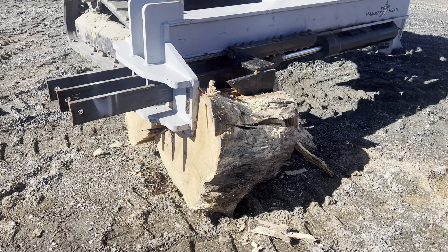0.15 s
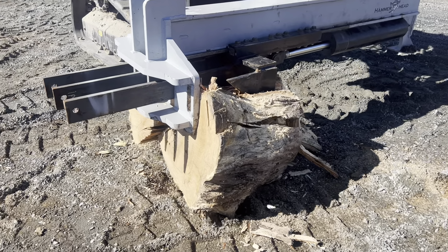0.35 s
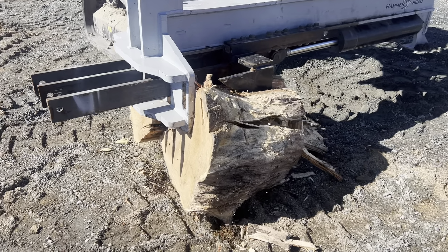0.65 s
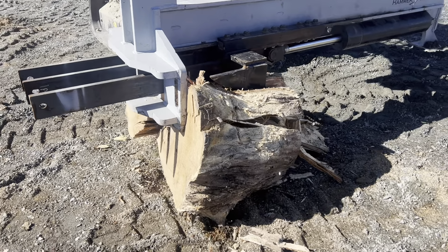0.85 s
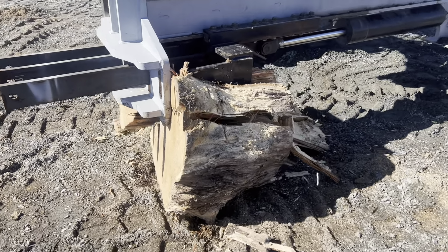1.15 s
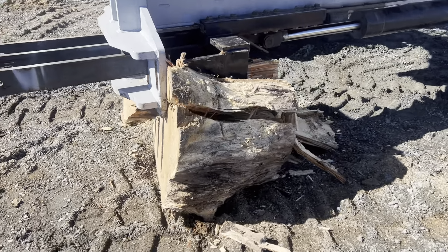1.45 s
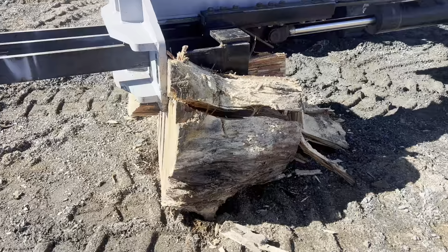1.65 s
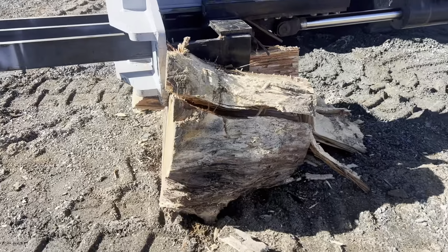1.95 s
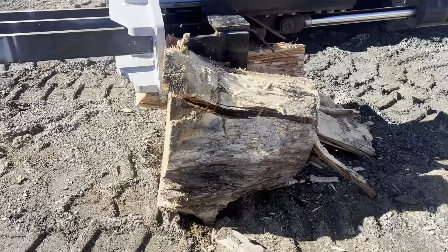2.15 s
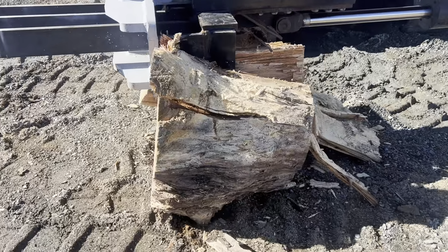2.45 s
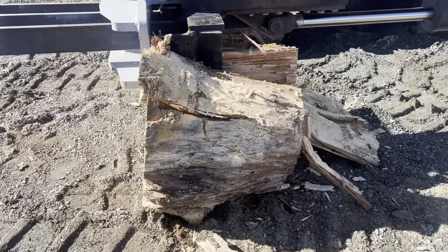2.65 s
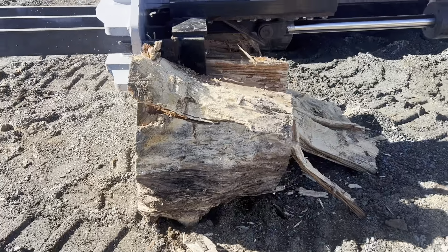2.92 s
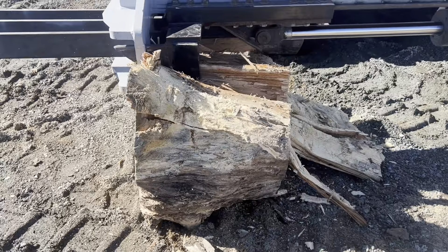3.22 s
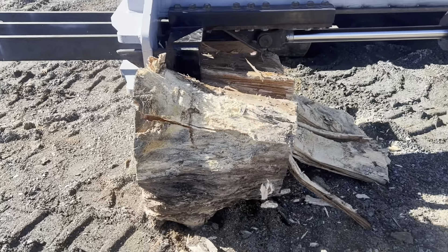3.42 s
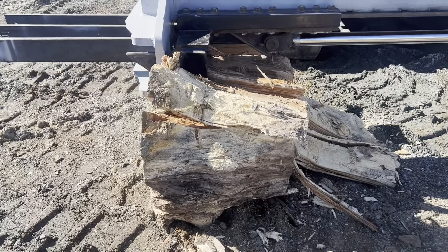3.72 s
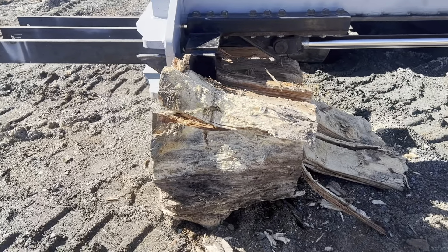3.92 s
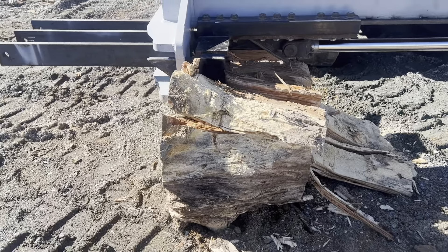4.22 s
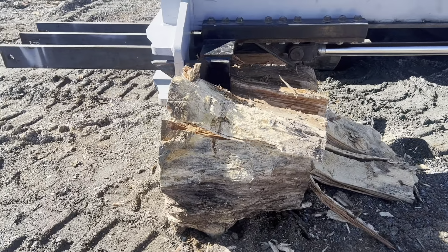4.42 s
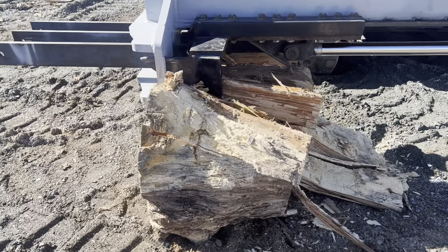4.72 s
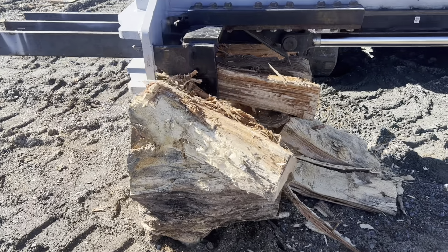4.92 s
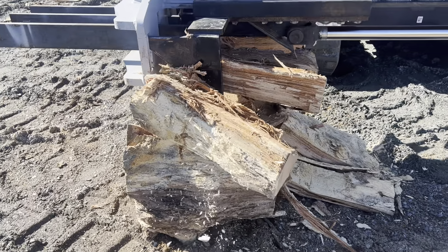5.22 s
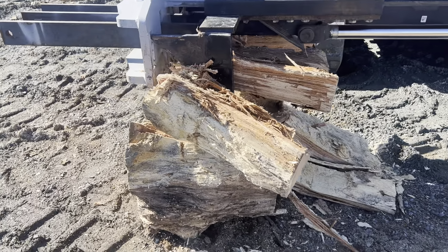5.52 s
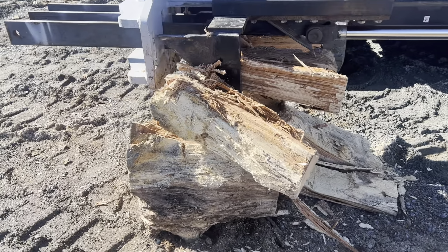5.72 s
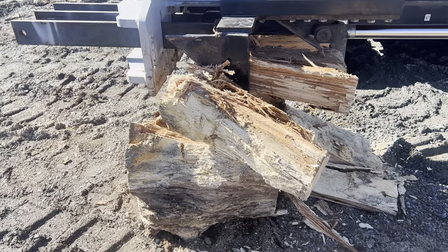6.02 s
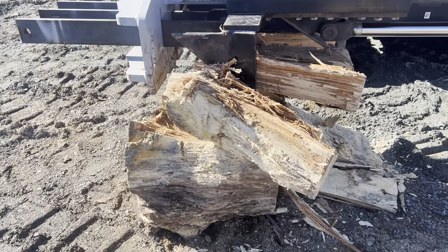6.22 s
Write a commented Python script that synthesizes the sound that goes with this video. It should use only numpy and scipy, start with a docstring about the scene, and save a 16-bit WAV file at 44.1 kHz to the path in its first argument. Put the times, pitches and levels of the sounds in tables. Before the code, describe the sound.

Over a throbbing engine and pump whine, wood fibres crackle, sharp cracks quicken into a tearing split, then rapid juddering knocks and sparse splinters.

```python
"""A hydraulic splitter pushes a big log through its wedge, outdoors on gravel, while engine and pump drone.
From the start fibres crackle and snap in bursts, the log cracks with short pitched rings; then it groans.
A quickening run of cracks with a few wedge squeaks ends as the log tears open.
Last, the log judders along the ringing steel, and a few late cracks and splinters follow.
Random clicks play snapping fibres, resonances give them the sound of wood or steel, and sines hum."""
import sys
import numpy as np
from scipy import signal
from scipy.fft import rfft, irfft, next_fast_len
from scipy.io import wavfile
from scipy.ndimage import uniform_filter1d, map_coordinates

SR = 44100
rng = np.random.default_rng(int(sys.argv[2]) if len(sys.argv) > 2 else 0)


def master(y):
    """Save y as 16-bit WAV."""
    cut = np.clip(np.atleast_2d(y).T, -1, 1)
    pcm = np.round(cut * 32767)  # scale
    wavfile.write(sys.argv[1], SR, pcm.astype(np.int16))


N = 280476
TIME = np.arange(N) / SR

# Engine hum: (multiple of the firing rate, relative level [dB])
ENGINE_ORDERS = [(1, -27.5), (1.5, -48), (2, -38.5), (2.5, -46.5), (4, -48.5), (5, -61), (6, -50.5),
                 (12, -70)]
# Pump whine: (multiple of the pump pitch, relative level [dB])
PUMP_TONES = [(1, -38.5), (2, -53.5)]
# Blade tone of the cooling fan: (multiple of the fan pitch, relative level [dB])
FAN_TONES = [(1, -47.5)]
# Whine an octave above the fan tone: (time [s], level [dB])
FAN_WHINE = [(0, -62), (5.0, -67), (5.4, -55), (6.3, -55)]
# Colour of the engine roar and fan noise: (frequency [Hz], relative level [dB per Hz])
ROAR_COLOUR = [(25, -28), (42, -16), (65, -0.5), (100, -5.5), (160, 0.5), (215, -1), (290, -12),
               (380, -9.5), (500, -13.5), (700, -19), (1100, -25.5), (2000, -33.5), (4500, -41),
               (6500, -44.5), (8700, -41.5), (11500, -88), (15000, -49)]
# The machine as heard from the moving listener: (time [s], roar [dB], pump [dB])
MACHINE_LEVELS = [(0, -25, 6), (.6, -25.5, 2), (1.3, -29, -3), (3.2, -29.5, 1), (4.5, -31, 1),
                  (5, -30, 2.5), (6.3, -27, 5)]
# How alike the roar is on the left and right: (frequency [Hz], likeness [0-1])
SIDE_LIKENESS = [(35, .75), (70, 0.95), (290, 1), (640, 0.81), (1400, 0.79), (3100, 1), (7000, 0.29),
                 (15000, 0.11)]
# Strain on the fibres, which sets how loudly they crackle: (time [s], level [dB])
FIBRE_STRAIN = [(0, -41), (.16, -44.5), (.22, -34.5), (.39, -40.5), (.53, -40.5), (.65, -42.5),
                (1.4, -41.5), (2.3, -42), (2.55, -32), (2.82, -40.5), (3.07, -47), (3.42, -47.5),
                (3.65, -51.5), (4.7, -51.5), (5.2, -58)]
# Colour of the fine crackle: (frequency [Hz], relative level [dB per Hz])
CRACKLE_COLOUR = [(400, -16), (900, 16.5), (1600, 4), (3000, 0), (6000, -2), (8500, -2), (12000, -1),
                  (16000, -3.5)]
# Cracks in the log: (time [s], length [s], relative level [dB], relative low thump level [dB])
CRACKS = [(0.026, 0.002, -29.5, -21.5), (0.0912, 0.0005, -30.5, -24.5), (0.1637, 0.0005, -31, -24),
          (0.185, .001, -33, -25.5), (0.202, 0.0077, -31.5, -30), (0.2376, 0.0052, -31, -31),
          (0.272, 0.013, -29.5, -22), (0.3, 0.0085, -31, -34), (0.3563, 0.0024, -22, -12),
          (0.381, 0.024, -31, -19.5), (0.436, 0.015, -25, -25), (0.486, 0.015, -23, -17),
          (0.772, 0.015, -28, -25.5), (0.832, 0.02, -22.5, -24.5), (0.866, 0.021, -35.5, -32),
          (0.893, 0.013, -28.5, -50), (0.912, 0.0036, -32.5, -41), (0.948, 0.0087, -34.5, -45),
          (1.027, .003, -37, -23), (1.031, 0.011, -26, -23.5), (1.214, 0.013, -31.5, -42),
          (1.535, 0.00092, -34.5, -45), (1.873, .002, -37, -31.5), (2.013, 0.002, -33.5, -26.5),
          (2.057, .003, -57, -15.5), (2.0645, 0.004, -19, -14), (2.13, 0.0027, -37.5, -22),
          (2.189, 0.014, -18.5, -14), (2.326, 0.0031, -19, -13), (2.397, 0.0012, -21.5, -15),
          (2.433, 0.0039, -21.5, -13.5), (2.483, 0.0015, -30, -22), (2.512, 0.0022, -20.5, -15.5),
          (2.555, 0.002, -21.5, -21.5), (2.588, 0.0041, -21.5, -13.5), (2.632, 0.0018, -20.5, -15.5),
          (2.66, 0.0045, -23, -16.5), (2.682, 0.0053, -21, -22), (2.706, 0.0078, -22.5, -32),
          (2.722, 0.0052, -20, -16.5), (2.727, 0.0023, -20.5, -15), (2.74, 0.0048, -24, -29),
          (2.745, 0.0061, -25.5, -44), (2.757, 0.0034, -29, -18), (2.767, 0.0041, -24, -29),
          (2.778, 0.0027, -28.5, -32), (2.788, .002, -33, -27), (2.807, 0.0092, -30, -19.5),
          (2.829, 0.0073, -35, -24), (2.842, 0.016, -31, -26), (2.861, 0.007, -35.5, -37),
          (2.902, .003, -45, -45), (3.554, 0.033, -41, -53), (3.798, 0.021, -44.5, -46),
          (4.254, 0.024, -33.5, -27.5)]
# Edges of a crack's four registers, thump, knock, snap and fizz: frequency [Hz]
CRACK_EDGES = [280, 620, 1800, 5000, 16500]
# Resonances of the log: (frequency [Hz], width [Hz], relative level [dB])
LOG_MODES = [(383, 58, -3.5), (462, 32.3, 4), (492, 30, 2), (635, 138, -6), (848, 87, -10), (963, 28, -2.5),
             (1085, 225, -10), (1474, 31, -6), (2230, 130, -9), (2820, 355, -3), (3430, 650, -8.5),
             (4460, 220, -5.5), (5040, 980, -24), (6530, 330, -7.5)]
# Ringing of the wedge's edge after cracks: (frequency [Hz], relative level [dB], time to fall 60 dB [s])
WEDGE_EDGE_MODES = [(5240, -7, .14), (6600, 8, 0.23)]
# Long ring of the wedge after jerks: (frequency [Hz], relative level [dB], time to fall 60 dB [s])
WEDGE_MODES = [(1346, -7, .3), (1685, -11, .35), (2120, 0, .55), (2165, -8, .4), (2546, -3, .3),
               (2800, -4, .25), (4290, -15, .27), (5850, -15, .24)]
# Thin splinters that snap off without moving the log: (time [s], relative level [dB])
SPLINTERS = [(0.05, -52), (0.071, -44), (0.128, -47), (0.315, -44), (0.328, -44), (0.391, -36),
             (0.412, -32.5), (0.559, -56), (0.626, -37), (0.6615, -48), (0.697, -58), (0.725, -59),
             (0.934, -50), (1.265, -40.5), (1.336, -46), (1.411, -41), (1.476, -41.5), (1.62, -46),
             (1.63, -55), (1.72, -40.5), (1.856, -45.5), (1.942, -43), (2.031, -47), (2.457, -37),
             (3.517, -50), (3.646, -53), (4.574, -60), (4.796, -50), (4.83, -55), (4.875, -55), (4.89, -57),
             (4.988, -48)]
# Short rings of the struck log, after single cracks and the first jerk:
# (time [s], pitch [Hz], level [dB], time to fall 60 dB [s])
STRUCK_RINGS = [(.205, 785, -27, 0.057), (.275, 751, -21.5, 0.056), (.303, 805, -28, 0.072),
                (.305, 575, -34, 0.15), (.36, 527, -21, 0.12), (.359, 3290, -28, 0.037),
                (.44, 576, -30, 0.17), (0.487, 2870, -26.5, 0.031), (0.489, 5050, -27, 0.04),
                (.774, 1185, -23.5, 0.027), (.837, 938, -16, 0.084), (.894, 1380, -27.5, 0.04),
                (.896, 2040, -33, .04), (.914, 930, -29, .05), (1.032, 316, -24.5, 0.071),
                (1.033, 850, -20, 0.033), (1.033, 2795, -31, 0.093), (1.033, 3300, -26.5, 0.06),
                (1.22, 851, -27, 0.11), (1.221, 1384, -34, 0.054), (1.22, 2013, -38, 0.065),
                (2.07, 461, -17, 0.25), (2.067, 867, -23.5, 0.22), (2.067, 736, -24, 0.086),
                (2.067, 3560, -44, 0.04), (2.191, 3300, -22.5, 0.062), (2.198, 388, -13, 0.038),
                (2.198, 696, -23, 0.1), (2.198, 854, -23, 0.12), (2.328, 660, -21, 0.08),
                (2.333, 850, -21, 0.2), (2.591, 1020, -25, 0.043), (2.722, 396, -22, .07),
                (2.724, 920, -26, 0.055), (2.767, 1190, -24.5, 0.042), (2.807, 839, -28.5, .35),
                (2.963, 480.3, -22.5, 0.4), (4.256, 2100, -40, 0.072), (4.255, 4180, -42, 0.08)]
# Groans of the squeezed log: (time of the peak [s], level [dB], fading [dB per s],
# slip rate at the peak [per s], pitch ratio, overtone before the pitch ratio [Hz])
GROANS = [(0.502, -22.5, 333, 110, 1.02, 1480), (1.445, -28, 172, 154, 1.01, 1700),
          (1.466, -35.5, 147, 121, 1.04, 1220), (1.513, -48, 200, 120, 1.0, 1680),
          (1.588, -25.5, 113, 122, 0.99, 1540), (1.738, -39, 172, 104, 1.02, 1480),
          (2.025, -36, 298, 137, 1.04, 1500)]
# Resonances heard in every groan: (frequency [Hz], width [Hz], relative level [dB])
GROAN_MODES = [(849, 21, 16), (935, 39, -2), (2250, 130, -10.5), (2560, 180, -15)]
# Tones from steady rubbing: (time of the middle [s], length [s], level [dB])
MOANS = [(1.23, .15, -46), (1.83, 0.15, -36)]
# Ring of the two halves while the split gapes, started by each thump:
# (frequency [Hz], relative level [dB], time to fall 60 dB [s])
HALVES_MODES = [(410, 3.5, .11), (444, -2, .32), (503, -6.5, .45), (850, -13, .3)]
# Squeaks of wood on the wedge: (time [s], peak level [dB])
SQUEAKS = [(2.438, -15), (2.517, -8.5), (2.559, -7)]
# Two runs of jerks along the steel: (time [s], relative blow level [dB], relative rattle level [dB])
JERKS = [(2.962, -20.5, -20), (2.98, -26, -28), (3.002, -23.5, -21), (3.021, -29, -25), (3.04, -27, -24),
         (3.058, -50, -51), (3.08, -42, -33), (3.108, -55, -35.5), (3.259, -19, -21), (3.2745, -21, -23.5),
         (3.2852, -19, -22), (3.2985, -22, -24.5), (3.3135, -22, -23.5), (3.336, -21.5, -21.5),
         (3.3597, -22.5, -20.5), (3.3828, -23, -22.5)]
# Where wood meets steel, as a jerk strikes it: (frequency [Hz], width [Hz], relative level [dB])
CONTACT_MODES = [(1210, 200, -2.5), (2330, 360, 0.5), (3360, 290, -9), (4270, 130, 4.5)]
# Resonances of the splitter frame: (frequency [Hz], width [Hz], relative level [dB])
FRAME_MODES = [(336, 38, 5.5), (498, 69, 9.5), (680, 51, 6), (803, 34, 7), (970, 41, 2), (1205, 40, 5.5),
               (1404, 36, -1), (1540, 24, 1), (1610, 30, 6), (1910, 110, -0.5), (2250, 43, -2.5),
               (2400, 71, -3), (3260, 190, -8.5), (3550, 100, -6.5), (4130, 130, -27), (5730, 510, -35)]
# The log bouncing back against the steel: (frequency [Hz], width [Hz], relative level [dB])
REBOUND_MODES = [(1180, 180, -3.5), (1630, 140, -6), (2520, 130, -13)]
# How the wood leans to one side: (frequency [Hz], left minus right [dB])
WOOD_BALANCE = [(400, -2.5), (700, 0), (1300, 3.5), (2500, 1), (4400, 3), (8100, 1.5), (15000, -1.5)]
# Treble of the microphone: (frequency [Hz], level [dB])
MIC_TREBLE = [(3000, 0), (5500, -1), (8500, -2), (11500, -3.5), (14000, -6.5), (16000, -5)]
# The two microphone ports hear out of step: (frequency [Hz], lead of the left [radians])
PORT_PHASE = [(0, 0.044), (1200, 0.44), (1700, 0.71), (3100, 1), (4500, 1), (7500, 0.68)]
# In the top octave the right port leads by a plain delay: (frequency [Hz], lead of the left [radians])
PORT_DELAY = [(8400, 0), (17000, -14.7)]

FIRING_HZ, PUMP_HZ, FAN_HZ = 82.75, 261.0, 499
# The split gapes between these times and takes GAPE_S to change.
OPENS_S, PARTS_S, GAPE_S = 1.74, 2.725, 0.067
# Knock, snap and fizz relative to a crack's level: closed wood muffles the cracks inside it.
MUFFLED_DB, GAPING_DB = (3.5, -0.5, -2), (-1, 0.5, -0.5)


def from_db(db):
    """Turn decibels into a gain."""
    return 10 ** (np.asarray(db) / 20)


def rms_one(x):
    """Scale a sound to an average strength (rms) of 1."""
    return x / np.sqrt(np.mean(x ** 2) + 1e-20)


def unit_burst(x):
    """Scale a short sound to the energy of 20 ms at rms 1."""
    return rms_one(x) * np.sqrt(.02 * SR / len(x))


def in_time(rows):
    """Read each column of a time curve at every sample."""
    s, *columns = np.transpose(rows)
    return [np.interp(TIME, s, column) for column in columns]


def at_hz(points, hz):
    """Read a spectrum between its points on a log-frequency axis."""
    point_hz, values = np.transpose(points)
    return np.interp(np.log(np.maximum(hz, 1)), np.log(point_hz), values)


def drift(rate):
    """Wander at random around zero with rms 1; a higher rate wanders faster."""
    knots = rng.standard_normal(4096)
    # one value serves 32 samples
    curve = map_coordinates(knots, [TIME[::32] * rate * 2], order=2, mode="wrap")
    return rms_one(curve).repeat(32)[:N]


def band(x, low_hz, high_hz, order=2):
    """Keep the sound between two frequencies."""
    edges = [low_hz, min(high_hz, .45 * SR)]
    return signal.sosfilt(signal.butter(order, edges, "band", fs=SR, output="sos"), x + 1e-18)


def resonate(x, modes):
    """Excite side-by-side resonances of alternating sign; a narrow one rings longer."""
    out = 0
    for k, (hz, width, db) in enumerate(modes):
        r = np.exp(-np.pi * width / SR)
        top = (-1) ** k * from_db(db) * (1 - r * r) / 2
        feedback = [1, -2 * r * np.cos(2 * np.pi * hz / SR), r * r]
        out = out + signal.lfilter([top, 0, -top], feedback, x + 1e-18)
    return out


def add(track, s, sound):
    """Mix a sound into a track at time s."""
    i = max(round(s * SR), 0)
    track[..., i:i + sound.shape[-1]] += sound[..., :N - i]


def grains(size, per_s, spread_db):
    """Make random clicks of uneven size and sign."""
    sizes = from_db(spread_db * np.minimum(rng.exponential(1, size), 4))
    signs = rng.choice([-1, 1], size)
    return sizes * signs * (rng.random(size) < per_s / SR)


def colour(x, spectrum):
    """Filter a sound with a spectrum in dB."""
    size = next_fast_len(N + SR // 10)
    gain = from_db(at_hz(spectrum, np.fft.rfftfreq(size, 1 / SR)))
    return irfft(rfft(x, size) * gain, size)[..., :N]


def gape(s):
    """Tell how far the split stands open at time s, 0-1."""
    return np.clip(min(s - OPENS_S, PARTS_S - s) / GAPE_S + .5, 0, 1)


def tones(hz, partials, wander, flutter_db):
    """Sum multiples of one pitch that wanders a little, each fluttering in level."""
    turns = np.cumsum(hz * (1 + wander * drift(5.2))) / SR
    out = 0
    for k, db in partials:
        strength = np.sqrt(2) * from_db(db + flutter_db * min(k, 2) * np.tanh(drift(7.6)))
        out = out + strength * np.sin(2 * np.pi * (k * turns + rng.random()))
    return out


def machine(throb=0.13, hiss_db=-26.0, hiss_follows=0.25, split_hz=600):
    """Firing hum, pump whine, fan tone, and a roar that throbs with the firings."""
    low_db, pump_db = in_time(MACHINE_LEVELS)
    hum = tones(FIRING_HZ, ENGINE_ORDERS, wander=0.0017, flutter_db=1.5)
    pump = from_db(pump_db) * tones(PUMP_HZ, PUMP_TONES, wander=0.0023, flutter_db=1.0)
    # mix a shared noise with an opposite-sided one to set how alike the sides are
    alike = np.clip(at_hz(SIDE_LIKENESS, np.fft.rfftfreq(N, 1 / SR)), 0, 1)
    throbbing = 1 + throb * np.sin(2 * np.pi * FIRING_HZ * TIME)
    mid, side = rfft(rng.standard_normal((2, N)) * throbbing)
    noise = irfft(np.sqrt(1 + alike) * mid + np.sqrt(1 - alike) * side * [[1], [-1]], N)
    roar = rms_one(colour(noise, ROAR_COLOUR))
    low = signal.sosfiltfilt(signal.butter(2, split_hz, fs=SR, output="sos"), roar)
    low = low * from_db(1.2 * drift(5))   # the roar swells and sinks a little
    hiss = from_db(hiss_follows * low_db + hiss_db) * (roar - low)
    fan = tones(FAN_HZ, FAN_TONES, wander=0.0028, flutter_db=3.0)
    whine = from_db(in_time(FAN_WHINE)[0]) * tones(FAN_HZ, [(2, 0)], wander=0.002, flutter_db=1)
    return hum + pump + fan + whine + from_db(low_db) * low + hiss


def fibres(crackle_db=-0.6, murmur_db=4, clump_db=2.5, tick_db=-10, ticks_per_s=60):
    """Under strain fine fibres snap in clumps, thicker ones tick singly, and the log's low modes murmur."""
    snaps = grains(N, 2200, spread_db=0.0) * from_db(clump_db * drift(35))
    crackle = from_db(crackle_db) * rms_one(colour(snaps, CRACKLE_COLOUR))
    knocks = resonate(grains(N, ticks_per_s, spread_db=5.5), LOG_MODES)
    ticks = from_db(tick_db) * rms_one(band(knocks, 820, 5700))
    low_wood = resonate(grains(N, 500, spread_db=0.0), LOG_MODES[:4])
    murmur = from_db(murmur_db) * rms_one(low_wood)
    strain = from_db(in_time(FIBRE_STRAIN)[0])
    return strain * (crackle + murmur + ticks * (TIME < PARTS_S))


def vary_log(detune=0.028, vary_db=3):
    """Each crack opens at another place, so the log's modes shift in pitch and strength."""
    modes = []
    for hz, width, db in LOG_MODES:
        a, b = rng.standard_normal(2)
        modes.append((hz * np.exp(detune * a), width, db + vary_db * np.tanh(b)))
    return modes


def register_levels(s, level_db, thump_db, thump_trim_db=-1, ring_takes_db=4.5, small_db=-34, brightens=0.68):
    """Set thump, knock, snap and fizz: an open split is brighter, and so is a small crack of thin fibres."""
    tilt_db = brightens * max(small_db - level_db, 0) * np.array([-1, 0, 1])
    wood_db = gape(s) * np.array(GAPING_DB) + (1 - gape(s)) * np.array(MUFFLED_DB)
    # the ringing halves take some of the dry thump
    dry_thump_db = thump_db + thump_trim_db - gape(s) * ring_takes_db
    return [dry_thump_db, *(level_db + tilt_db + wood_db)]


def cracks(snaps_per_s=6500, rise=0.00025, fade=0.0044, after_db=-20, after_fade=0.092, direct_db=-16,
           first_db=2, break_db=12, break_lag=0.00092, band_fade=(.5, .15, .08, .035)):
    """Each crack is an avalanche of snapping fibres, strongest at first, that sets the log ringing."""
    out, t = np.zeros(N), TIME[:SR // 4]
    filters = [signal.butter(3, edges, "band", fs=SR, output="sos")
               for edges in zip(CRACK_EDGES, CRACK_EDGES[1:])]
    for s, length, level_db, thump_db in CRACKS:
        past = np.maximum(t - length, 0)
        avalanche = np.exp(-past / fade) + from_db(first_db) * np.exp(-t / fade)
        avalanche = avalanche + from_db(after_db) * np.exp(-past / after_fade)
        snaps = np.minimum(t / rise, 1) * avalanche * grains(len(t), snaps_per_s, spread_db=1.0)
        # fibres give way in bundles, and the first bundle breaks at once
        snaps = snaps * from_db(3 * np.minimum(t / .005, 1) * drift(300)[:len(t)])
        snaps[int(break_lag * SR)] += from_db(break_db)
        wood = resonate(snaps, vary_log()) + from_db(direct_db) * snaps
        levels = register_levels(s, level_db, thump_db)
        for sos, db, dies in zip(filters, levels, band_fade):
            # late snaps are duller: the treble dies first
            register = signal.sosfilt(sos, wood) * np.exp(-past / dies)
            add(out, s, from_db(db) * unit_burst(register))
    return out


def ring_on(blows, modes, level_db, waver_hz):
    """Lightly damped modes gather energy from every blow (time [s], level [dB]) and ring on afterwards."""
    fed, out = np.zeros(N), 0
    for s, db in blows:
        add(fed, s, from_db([db + level_db]) ** 2)
    fed = signal.lfilter(np.full(128, 1 / 128), [1], fed)   # soften each start over 128 samples
    for hz, db, t60 in modes:
        keeps = from_db(-60 / (t60 * SR)) ** 2
        energy = signal.lfilter([1], [1, -keeps], fed + 1e-18)
        turns = np.cumsum(hz + waver_hz * drift(6.2)) / SR   # the shifting load bends the pitch
        out = out + from_db(db) * np.sqrt(energy) * np.sin(2 * np.pi * turns)
    return out


def wedge(edge_db=-25):
    """The wedge's edge rings thinly with every crack, and the steel sings on after the jerks."""
    crack_blows = [(s, db) for s, _, db, _ in CRACKS]
    jerk_blows = [(s, db) for s, _, db in JERKS]
    edge = ring_on(crack_blows, WEDGE_EDGE_MODES, level_db=edge_db, waver_hz=12.3)
    return edge + ring_on(jerk_blows, WEDGE_MODES, level_db=-15.5, waver_hz=3)


def splinters(level_db=1, snaps_per_s=6500, fade=0.0017, low_hz=1700, high_hz=10000):
    """A splinter gives one short, bright spray of snaps."""
    out, t = np.zeros(N), TIME[:SR // 20]
    for s, db in SPLINTERS:
        snaps = grains(len(t), snaps_per_s, spread_db=3) * np.exp(-t / fade)
        spray = band(snaps, low_hz, high_hz, order=1)
        add(out, s, from_db(db + level_db) * unit_burst(spray))
    return out


def struck(hz, t60, waver=0.0065, rise=0.0007):
    """One mode of wood dies away while the shifting load bends its pitch."""
    t = TIME[:SR // 3]
    turns = np.cumsum(hz * (1 + waver * drift(40)[:len(t)])) / SR
    shape = (1 - np.exp(-t / rise)) * from_db(-60 * t / t60)
    return shape * np.sin(2 * np.pi * (turns + rng.random()))


def struck_rings(high_hz=2000, high_ratios=(.955, .985, 1.01, 1.05)):
    """The struck log rings briefly at one pitch; high rings have a cluster of close modes."""
    out = np.zeros(N)
    for s, hz, db, t60 in STRUCK_RINGS:
        ratios = high_ratios if hz > high_hz else [1]
        ring = sum(struck(hz * ratio, t60, waver=0.0093) for ratio in ratios)
        add(out, s, from_db(db) * unit_burst(ring))
    return out


def groan(jitter=0.06, uneven_db=4.0, rub=0.09, rub_fade=0.0021, overtone_width_hz=60, overtone_db=-2.5,
          swell_db_per_s=600, hold_s=.015, glide_per_s=0.135, waver=.012, slips_slow_per_s=4.3):
    """Small, rubbing slips excite the log; a groan swells fast, then fades as the grip lifts its pitch."""
    out, lead = np.zeros(N), .06   # each groan starts this long before its peak [s]
    t = TIME[:SR // 2] - lead
    for s, peak_db, fading, per_s, pitch, overtone_hz in GROANS:
        # the slips thin out as the groan fades
        rate = per_s * np.exp(jitter * drift(40)[:len(t)] - slips_slow_per_s * t)
        slips = np.diff(np.floor(np.cumsum(rate) / SR), prepend=0)
        slips = slips * from_db(uneven_db * drift(58.0)[:len(t)])
        rubbing = signal.lfilter([1], [1, -np.exp(-1 / (rub_fade * SR))], slips)
        slips = slips + rub * rng.standard_normal(len(t)) * rubbing
        body = resonate(slips, GROAN_MODES + [(overtone_hz, overtone_width_hz, overtone_db)])
        # even out the strength so that the swell and fade below shape it
        body = body / np.sqrt(uniform_filter1d(body ** 2, size=SR // 25) + 1e-12)
        # reading the sound ever faster makes the pitch climb as the grip tightens
        speed = pitch * (1 + glide_per_s * t + waver * drift(30.4)[:len(t)])
        gliding = map_coordinates(body, [np.cumsum(speed)], order=2)
        drop_db = np.maximum(-swell_db_per_s * t, fading * np.maximum(t - hold_s, 0))
        add(out, s - lead, from_db(peak_db - drop_db) * gliding)
    return out


def moan(pitch_hz=508):
    """Steady rubbing makes the log's low mode sing, a short and nearly pure tone."""
    swell = sum(from_db(db) * np.exp(-(2 * (TIME - s) / length) ** 4) for s, length, db in MOANS)
    return swell * tones(pitch_hz, [(1, 0)], wander=0.0073, flutter_db=2.5)


def gaping_halves(level_db=-4.0, detune=.015):
    """While the split gapes the halves can swing, and each thump rings them at a slightly new pitch."""
    out = np.zeros(N)
    for s, _, _, thump_db in CRACKS:
        if gape(s) > .5:
            ring = 0
            for hz, db, t60 in HALVES_MODES:
                ring = ring + from_db(db) * struck(hz * np.exp(detune * rng.standard_normal()), t60)
            add(out, s, from_db(thump_db + level_db) * unit_burst(ring))
    return out


def squeaks(pitch_hz=2350, length=0.0027):
    """A few cycles of friction tone sound as the wedge jumps forward."""
    out = np.zeros(N)
    for s, db in SQUEAKS:
        swell = from_db(db) * np.exp(-((TIME - s) / length) ** 2)
        out += swell * np.sin(2 * np.pi * pitch_hz * (TIME - s))
    return out


def judder(thud_hz=950, thud_lag=0.0013, thud_s=0.00081, thud_db=-3.0, slip_db=-5.5, slip_fade=0.0037,
           direct_db=-12, rattle_rise=0.0019, rattle_fade=0.015, rattle_trim_db=-1, fresh=.4,
           scrape_db=-17, scrape_fade=0.024, rebound_lag=0.0083, rebound_fade=0.0026, rebound_db=-9):
    """Every jerk is a gritty slip that stops with a thud, bounces once and rattles the frame."""
    out, t = np.zeros(N), TIME[:SR // 4]
    same = grains(len(t), 1500, spread_db=2.5)   # the part of the rattle all jerks share
    for s, blow_db, rattle_db in JERKS:
        grit = rng.standard_normal(len(t)) * np.exp(-t / slip_fade)
        slip = resonate(grit, CONTACT_MODES) + from_db(direct_db) * band(grit, 500, 10500, order=1)
        thud = np.exp(-((t - thud_lag) / thud_s) ** 2)
        thud = thud * np.sin(2 * np.pi * (thud_hz * t + rng.random()))
        add(out, s, from_db(blow_db + slip_db) * unit_burst(slip))
        add(out, s, from_db(blow_db + thud_db) * unit_burst(thud))
        chatter = same + fresh * grains(len(t), 1500, spread_db=2.5)
        chatter = chatter * (1 - np.exp(-t / rattle_rise))
        rattle = resonate(chatter * np.exp(-t / rattle_fade), FRAME_MODES)
        scrape = band(chatter * np.exp(-t / scrape_fade), 460, 9200, order=1)
        rattle = rattle + from_db(scrape_db) * scrape
        add(out, s, from_db(rattle_db + rattle_trim_db) * unit_burst(rattle))
        bounce = rng.standard_normal(len(t)) * np.exp(-t / rebound_fade)
        rebound = resonate(bounce, REBOUND_MODES)
        add(out, s + rebound_lag, from_db(rattle_db + rebound_db) * unit_burst(rebound))
    return out


def scatter(x, level_db, t60, low_hz, high_hz):
    """Steel and gravel throw back dense reflections, different on each side."""
    t = TIME[:SR // 3]
    echoes = band(rng.standard_normal((2, len(t))), low_hz, high_hz, order=3) * from_db(-60 * t / t60)
    echoes = rms_one(echoes) / np.sqrt(len(t))
    return from_db(level_db) * signal.fftconvolve(x[None], echoes, axes=1)[:, :N]


def scene():
    """The log lies slightly to the left, with steel and gravel close around it."""
    wood = fibres() + cracks() + splinters() + struck_rings() + groan() + moan()
    wood = wood + gaping_halves() + squeaks() + judder()
    # close reflections arrive from the sides and widen the sound
    sideways = scatter(wood, level_db=-29.5, t60=0.0033, low_hz=800, high_hz=5400)[0] * [[1], [-1]]
    far = scatter(wood, level_db=-12.0, t60=0.13, low_hz=926, high_hz=7700)
    left, right = wood + wedge() + sideways + far
    lean_left = [(hz, db / 2) for hz, db in WOOD_BALANCE]
    lean_right = [(hz, -db / 2) for hz, db in WOOD_BALANCE]
    return np.array([colour(left, lean_left), colour(right, lean_right)]) + machine()


def record(dry, left_db=0.05, peak=1.1, cutoff_hz=15800):
    """The ports colour the treble and shift it between the sides; peaks are rounded and the top is cut."""
    size, margin = next_fast_len(N + SR // 5), SR // 10
    hz = np.fft.rfftfreq(size, 1 / SR)
    lead = np.interp(hz, *np.transpose(PORT_PHASE + PORT_DELAY))
    padded = np.pad(dry, [(0, 0), (margin, margin)], "reflect", reflect_type="odd")
    left, right = rfft(padded, size) * from_db(at_hz(MIC_TREBLE, hz))
    shifted = np.array([from_db(left_db) * left, right * np.exp(-1j * lead)])
    out = irfft(shifted, size)[:, margin:margin + N]
    rounded = peak * np.tanh(out / peak)
    return signal.sosfilt(signal.ellip(10, .2, 80, cutoff_hz, fs=SR, output="sos"), rounded)


dry = scene()
out = record(dry)
master(out)
```